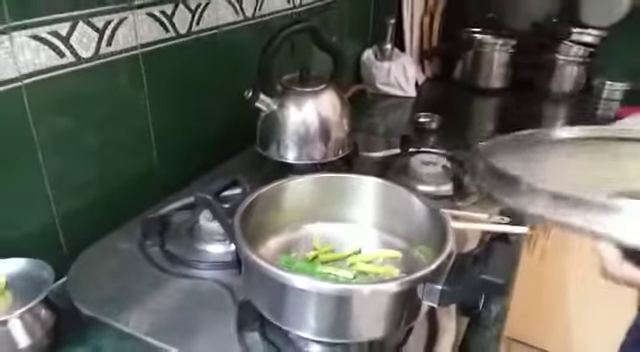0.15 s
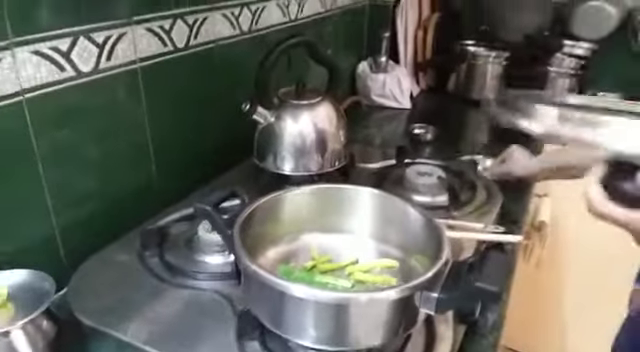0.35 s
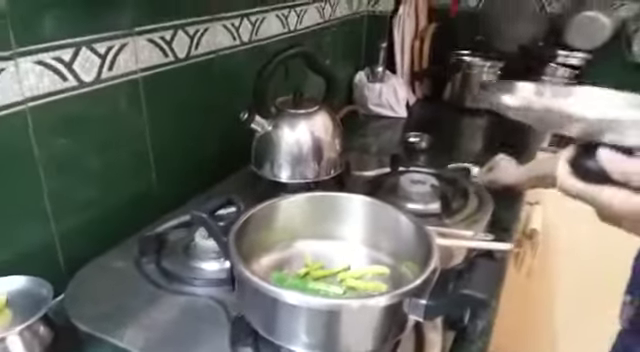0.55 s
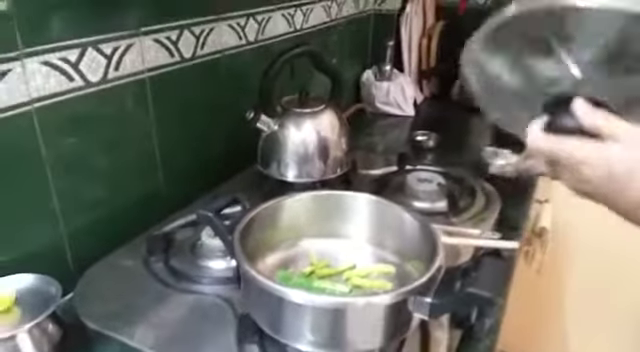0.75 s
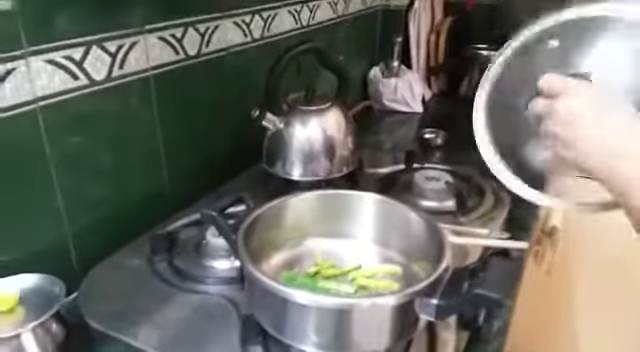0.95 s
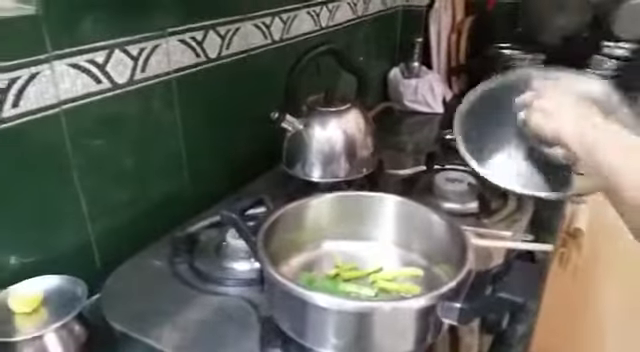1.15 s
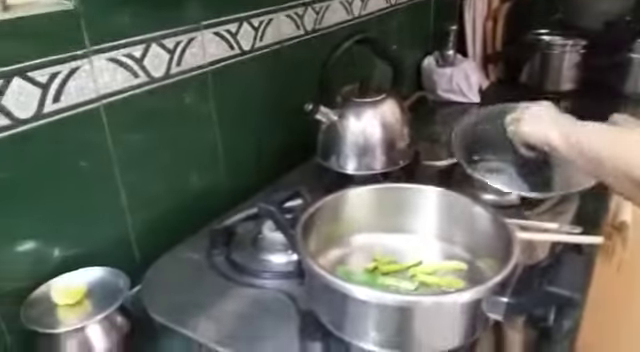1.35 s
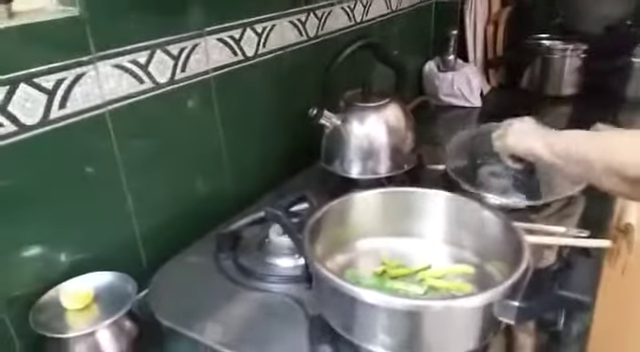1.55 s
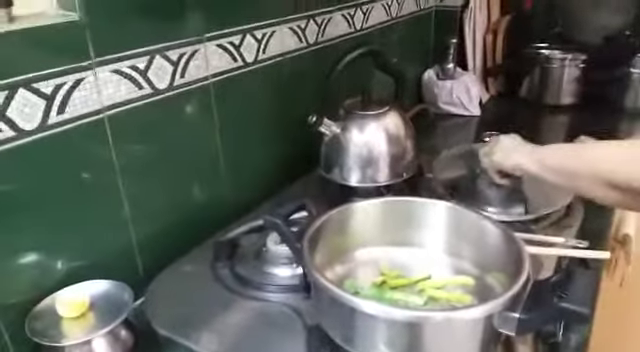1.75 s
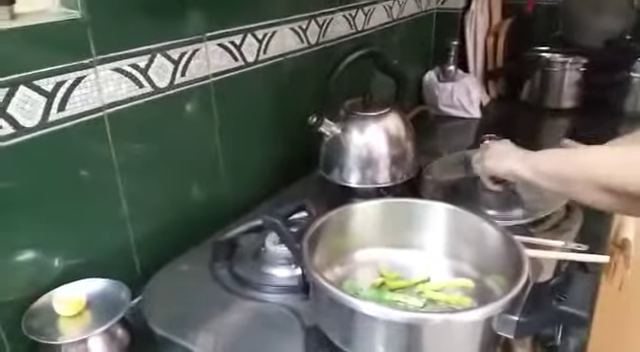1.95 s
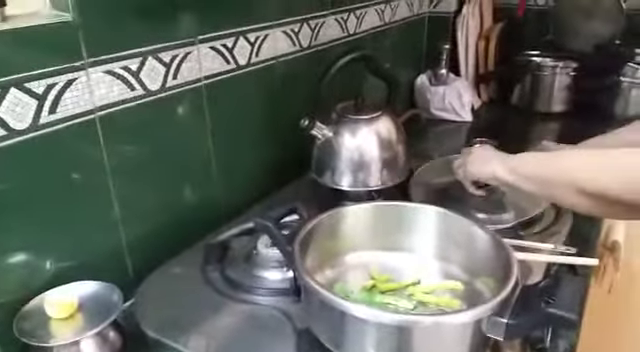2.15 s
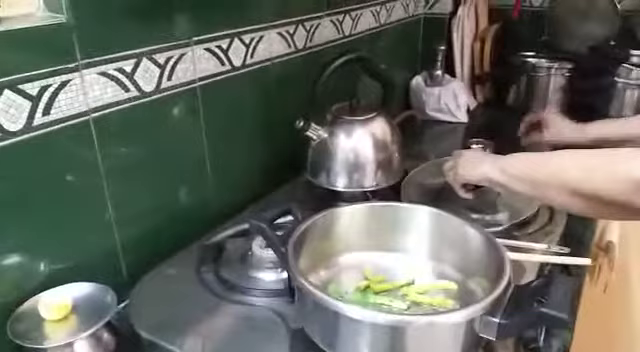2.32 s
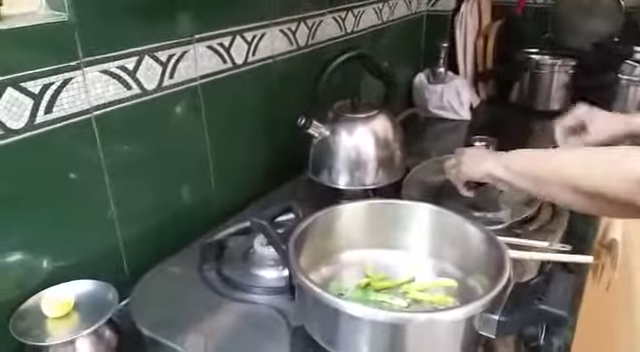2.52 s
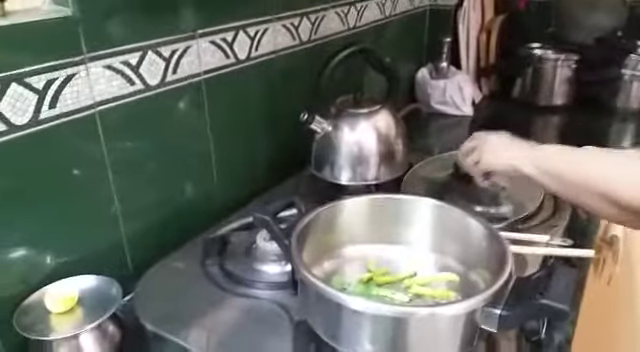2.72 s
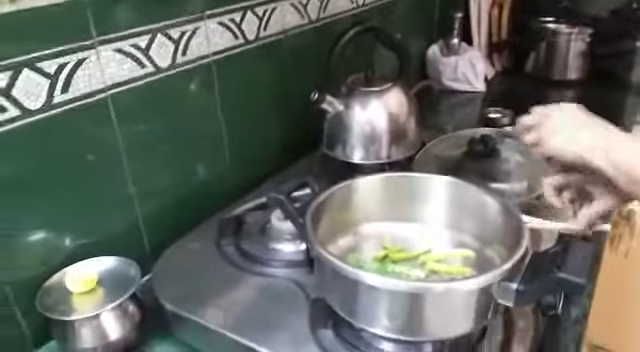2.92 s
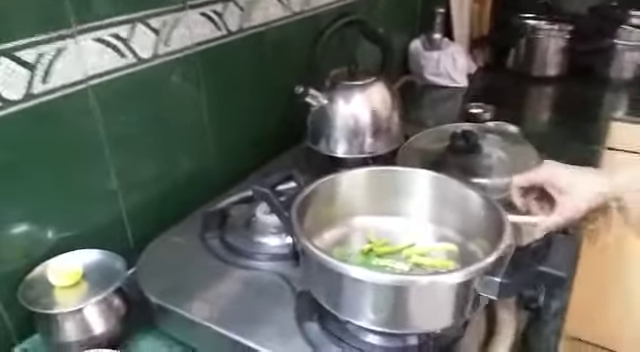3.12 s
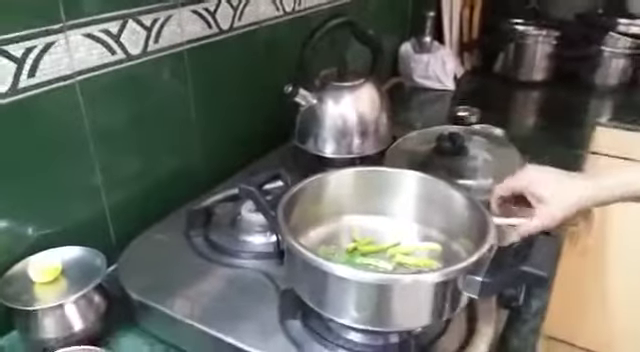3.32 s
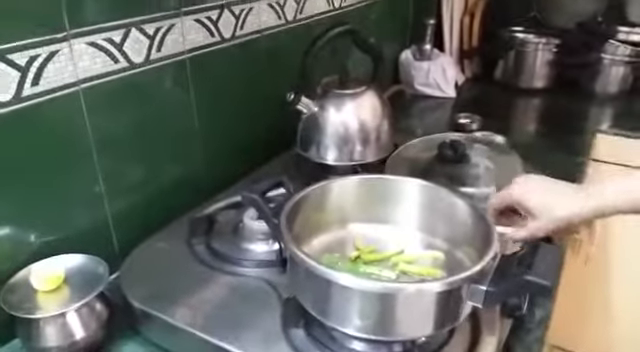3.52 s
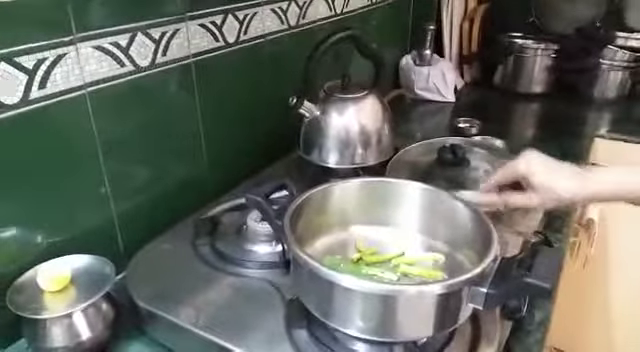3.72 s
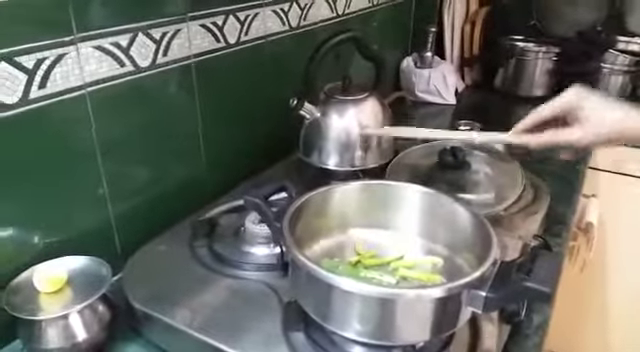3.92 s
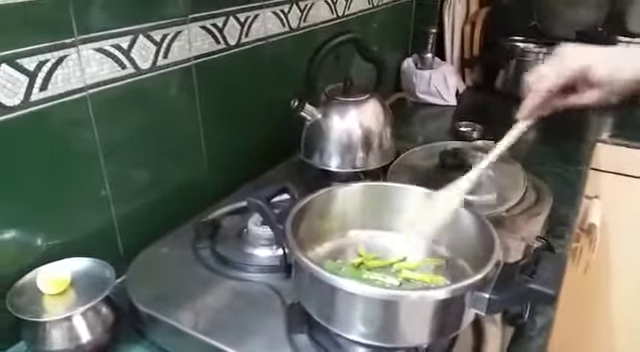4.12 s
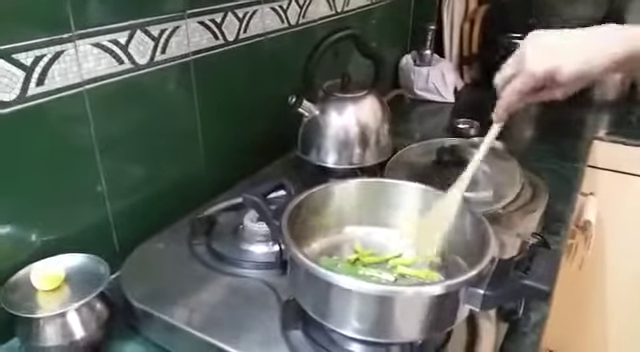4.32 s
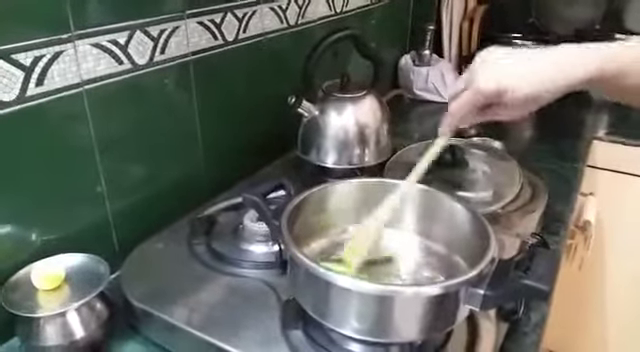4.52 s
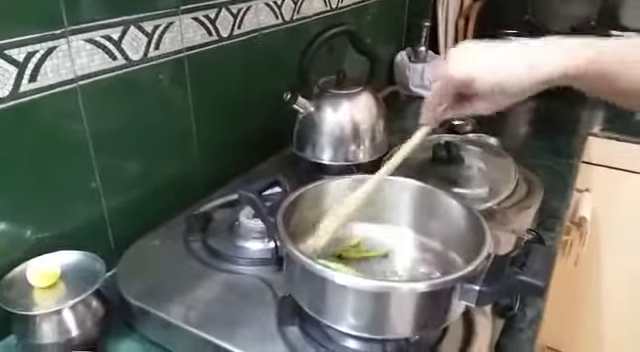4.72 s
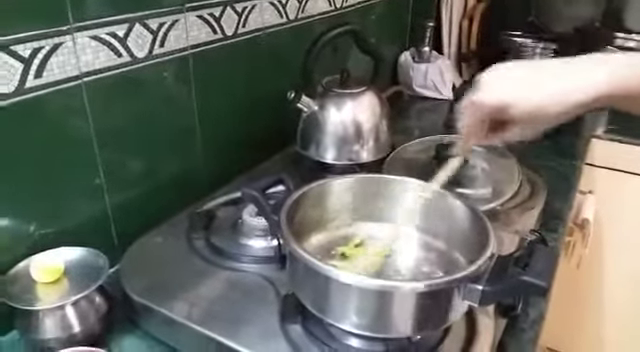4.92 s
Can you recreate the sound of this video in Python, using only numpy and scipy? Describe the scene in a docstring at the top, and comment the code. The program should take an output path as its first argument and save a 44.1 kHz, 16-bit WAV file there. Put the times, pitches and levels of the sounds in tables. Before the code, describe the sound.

Chilies and leaves sizzle finely in hot oil as a lid knocks, clangs loudly onto steel ware, then a wooden spatula stirs up coarse crackling.

```python
"""A fine sizzle and a soft gas flame come first: green chilies and curry leaves fry in a steel pan.
Shaped clicks and noise make the sizzle; drops snap and steam bubbles ring briefly as they burst.
In the tiled kitchen a steel-rimmed glass lid is put down, shifted, and drops with a clang onto steel ware.
Then a wooden spatula knocks and stirs, and the frying swells into a coarser crackle.
Each blow is a burst of noise shaped by the object's body, plus its own dying tones."""
import sys
import numpy as np
from scipy import signal
from scipy.fft import rfft, irfft
from scipy.io import wavfile
from scipy.ndimage import uniform_filter1d, minimum_filter1d

SR = 44100
rng = np.random.default_rng(int(sys.argv[2]) if len(sys.argv) > 2 else 0)


def store_wav(level_fs):
    """Save 16-bit WAV to argv[1]."""
    pcm = np.round(np.clip(np.atleast_2d(level_fs), -1, 1) * 32767)
    wavfile.write(sys.argv[1], SR, pcm.T.astype(np.int16))


N = 223454
TIME = np.arange(N) / SR

# Spectra, giving only the balance between pitches: (f/Hz, level/dB per Hz)
# food lying still, and food pushed over hot steel
RESTING_SPECTRUM = [(1470, -42), (2500, -31), (3080, 1), (3440, -4), (4440, 7.5), (5780, -2), (6350, 3),
                    (11800, 3), (13700, 0.5), (15200, 1.5), (16000, -3.5)]
STIRRED_SPECTRUM = [(900, -26), (1500, -29), (1850, -15), (2200, 1.5), (2700, -14), (3100, -1), (4000, -2),
                    (5600, 2), (6700, 2), (9000, 0), (11700, 8), (15900, -8)]
# the burner's rush, and the snap of a spitting drop
FLAME_SPECTRUM = [(25, -9), (50, -24), (75, -21), (115, -3), (190, -6), (260, -8.5), (310, -2), (410, -0.5),
                  (520, -2), (680, -7.5), (1000, -5.5), (1850, -7.5), (2800, -17.5), (3700, -20.5)]
SNAP_SPECTRUM = [(60, -6), (300, -13.5), (1200, -5.5), (2700, -13), (4200, -6), (9000, -7), (16000, -1.5)]
# dense resonances of the lid, the steel ware and the loaded pan
LID_BODY = [(35, -86), (80, -29), (140, -7.5), (300, -4.5), (560, -7), (780, -4), (980, -9), (1400, -4.5),
            (1900, -1.5), (2400, -10), (3100, -15.5), (4800, -10), (7000, -17), (15500, -18)]
STEEL_BODY = [(40, -54.5), (100, -35), (230, -9.5), (340, -4), (560, -12), (750, -11), (1070, -9.5),
              (1450, -5.5), (2400, -10.5), (4000, -6), (5000, -4.5), (8500, -6), (11600, -2), (16000, -5.5)]
PAN_BODY = [(40, -88), (120, -18), (330, -2), (550, -6), (800, -5), (1100, -6), (1500, -4.5), (2500, -8),
            (3700, -2), (6000, -8), (15500, -3)]

# Clear tones of each object, with the time to fall by 60 dB: (f/Hz, level/dB, t60/s)
LID_MODES = [(620, -14, .4), (1497, 0, .5), (1577, -4, .42), (1830, -1, .35), (2446, -10, .7),
             (2912, -9, .56), (3176, -14, .4), (4016, -15, .5), (4732, -11, .5), (6654, -19, .6),
             (6982, -14, .3), (8619, -19, .32), (13900, -18, .25), (14690, -18, .3)]
STEEL_MODES = [(743, -8, .45), (1460, -2, .4), (1990, -9, .6), (2896, -6, .4), (3440, -7, .45),
               (3565, -8, .5), (4019, 1, .5), (4077, -5, .45), (4325, -1.5, .52), (5152, -8, .35),
               (5779, -4, .4), (5879, -3, .4), (6757, -7, .4), (7473, -4, .6), (7910, -10, .4),
               (8721, -9, .3), (9176, -10, .4), (9494, -10, .35), (9945, -9, .44), (10481, -10, .35),
               (11057, -7, .33), (11239, 0, .33), (11281, -5, .3), (11607, 3, .3), (12016, -10, .4),
               (12495, -8, .33), (12936, -9, .3), (14470, -6, .3)]
PAN_MODES = [(1470, -33, 0.23), (1875, 2.5, 0.065), (2350, -10, 0.23), (3727, 6, 0.074)]
# how long the room's echoes last at each pitch: (f/Hz, t60/s)
KITCHEN_T60 = [(150, 0.63), (500, 0.47), (1500, 0.52), (4000, 0.41), (8000, 0.33), (15000, 0.38)]

# vigour of the resting sizzle, before its trim: (t/s, level/dB)
SIMMER_LEVELS = [(0.0, -47), (0.51, -41.5), (1.01, -46), (1.29, -46.5), (1.67, -41), (1.87, -47.5),
                 (2.61, -49.5), (2.98, -47.5), (3.6, -42.5), (4.3, -45.5)]
# the spatula pushes food over hot steel: (t/s, length/s, level/dB)
STROKES = [(4.211, 0.35, -37), (4.717, 0.28, -32)]
# large steam bubbles that ring as they burst: (t/s, level/dB, f/Hz)
BUBBLES = [(0.057, -6.5, 4560), (.088, -11, 6700), (0.0924, -10.5, 9200), (.1424, -9, 9780),
           (0.2042, -12.5, 8800), (.386, -5.5, 10100), (0.504, -11.5, 9850), (0.5696, -9, 4160),
           (0.844, -10, 10500), (1.2952, -12, 7700), (2.133, -3.5, 4870), (2.231, -4, 7140),
           (2.4347, -11.5, 7000), (3.9046, -7.5, 3240), (4.1085, -10, 5440), (4.2274, -8, 8000),
           (4.4535, -14, 12100)]
# pitch range of the small bubbles: lowest f/Hz, highest f/Hz
SMALL_BUBBLE_RANGE = (3980, 13300)
# water drops that spit with a sharp snap: (t/s, level/dB)
SPITS = [(0.658, -11), (1.1722, -11.5), (1.4651, -6.5), (1.6757, -4.5), (1.902, -0.5), (1.9177, -1),
         (2.096, 10.5), (2.345, -3.5), (2.381, -6.5), (2.6666, -11), (3.4722, 1.5), (4.345, 1),
         (4.5433, -0.5), (4.5522, 1), (4.596, 0.5), (4.7493, 1.5), (4.9308, -5)]
# the lid's rim knocks: (t/s, level/dB, chatter/s, thud f/Hz, bright/dB, ring/dB, favoured f/Hz)
LID_KNOCKS = [(.275, -24.5, 0.0037, 1820, -9, 1.5, 4920), (0.297, -32, 0.0089, 1450, 5, -4, 2910),
              (1.482, -23, 0.0069, 1380, -1.5, -3, 2450), (1.509, -22.5, 0.017, 760, 3, -21, 2450),
              (1.527, -24.5, 0.0054, 301, 4.5, -9, 2450), (1.724, -26, 0.019, 3570, -12, -16, 2450),
              (1.768, -22, 0.03, 4060, -16, -14, 1830)]
# the lid is shifted where it lies: (t/s, level/dB, chatter/s)
LID_SHIFTS = [(2.162, -34.5, .021), (2.181, -31.5, 0.021), (2.68, -33.5, 0.035), (2.712, -34.5, 0.021)]
# the lid falls onto steel ware and bounces: (t/s, level/dB, chatter/s, thud f/Hz)
CLANGS = [(3.000, -21, 0.053, 245), (3.046, -13, 0.013, 5900), (3.064, -13.5, 0.015, 1400),
          (3.091, -11.5, 0.0036, 3100), (3.104, -15, 0.0029, 4000)]
# the spatula meets the pan: (t/s, level/dB, chatter/s, thud f/Hz, bright/dB)
SPATULA_KNOCKS = [(4.150, -20.5, 0.017, 350, -19), (4.375, -34, 0.0025, 3430, 3),
                  (4.629, -38.5, 0.0083, 3400, 3.5), (4.714, -31.5, 0.0038, 3180, 4),
                  (4.87, -47, 0.015, 4880, 14.5), (4.935, -32.5, 0.0046, 5640, 5.5)]

SIMMER_TRIM_DB, FLAME_DB = 0.5, -44.5
STROKE_ATTACK_S, STROKE_RELEASE_S = 0.078, 0.13
POP_ECHO_S, POP_ECHO_DB, POP_SPRAY_DB = 0.0023, -12, -10
SPIT_LOW_HZ, SPIT_DB_PER_OCTAVE = 2660, 7   # low edge of a 0 dB spit; bigger ones reach lower
SMALL_BUBBLES_PER_S, SMALL_BUBBLE_DB, SMALL_BUBBLE_SPREAD_DB = 20, -20.5, 2.5
LID_THUD_DB, LID_NEAREST_DB = 13.5, 10
SHIFT_THUD_HZ, SHIFT_THUD_DB, SHIFT_BRIGHT_DB, SHIFT_RING_DB = 298.6, 14, 7, -16
CLANG_THUD_DB, CLANG_RING_DB = 4.5, 0
SPATULA_THUD_DB, SPATULA_RING_DB = 7, -1.5
RING_WAVER_DB = 2.5
CUTOFF_HZ = 15900


def from_db(db):
    """Turn a level in dB into a gain."""
    return 10 ** (np.asarray(db) / 20)


def rms_one(x):
    """Scale a signal to rms 1."""
    return x / np.sqrt(np.mean(x ** 2) + 1e-20)


def at_hz(points, hz):
    """Read a (f/Hz, value) table on a log-frequency axis."""
    points = np.array(points)
    return np.interp(np.log(hz + 1), np.log(points[:, 0]), points[:, 1])


def add(track, s, sound):
    """Mix a sound into the track from time s on."""
    start = int(s * SR)
    part = sound[..., :N - start]
    track[..., start:start + part.shape[-1]] += part


def drift(rate):
    """Random wandering: lines between chance values of spread 1, at this many values per second."""
    knots = rng.standard_normal(N // 100)
    return np.interp(TIME * rate, np.arange(len(knots)), knots)


def response(spectrum, bump_hz=500, bump_db=0, high_db=0, bump_octaves=0.39, high_hz=3000, size=2048):
    """Build a filter from a spectrum (energy 1), then add a broad bump and a treble shelf."""
    hz = np.arange(size // 2 + 1) * SR / size
    bump = bump_db * np.exp(-np.square(np.log2((hz + 1) / bump_hz) / bump_octaves))
    shelf = high_db * (1 - 1 / (1 + np.square(hz / high_hz) ** 2))
    gains = rms_one(from_db(at_hz(spectrum, hz))) * from_db(bump + shelf)
    cepstrum = irfft(np.log(gains))
    cepstrum[1:size // 2] *= 2      # folding the cepstrum makes the filter react at once (minimum phase)
    cepstrum[size // 2 + 1:] = 0
    return irfft(np.exp(rfft(cepstrum)))


def coloured(x, spectrum):
    """Give a signal a spectrum, at rms 1."""
    return rms_one(signal.fftconvolve(x, response(spectrum))[:N])


def resonate(x, hz, width_hz):
    """Pass a signal through one resonance, with gain 1 at its peak."""
    r = np.exp(-np.pi * width_hz / SR)
    feed = np.array([1, 0, -1]) * (1 - r * r) / 2
    feedback = [1, -2 * r * np.cos(2 * np.pi * hz / SR), r * r]
    return signal.lfilter(feed, feedback, x)


def kitchen(build_s=0.00043, count=9):
    """The tiled room's dense echoes: noise in overlapping bands, each dying at its own rate; energy 1."""
    t = TIME[:SR]
    white = rfft(rng.standard_normal(SR))
    hz = np.arange(SR // 2 + 1)
    centres = np.geomspace(80, 16000, count)
    tail = np.zeros(SR)
    for centre, share in zip(centres, np.eye(count)):
        band = irfft(white * np.interp(hz, centres, share), SR)
        tail += band * from_db(-60 * t / at_hz(KITCHEN_T60, centre))
    tail = tail * (1 - np.exp(-t / build_s))
    return tail / np.linalg.norm(tail)


def sizzle():
    """Food lying still sizzles finely; pushed over hot steel it crackles more coarsely."""
    fine = crackle(per_s=1800, size_db=7.0, clump_db=3.5, width_hz=1060,
                   grain_db=-4.0, hiss_db=-2.0, flutter_db=1.5)
    coarse = crackle(per_s=1700, size_db=4.0, clump_db=4.5, width_hz=1450,
                     grain_db=1.0, hiss_db=-1.5, flutter_db=7.5)
    return simmering() * coloured(fine, RESTING_SPECTRUM) + stirring() * coloured(coarse, STIRRED_SPECTRUM)


def crackle(per_s, size_db, clump_db, width_hz, grain_db, hiss_db, flutter_db, count=14):
    """Tiny steam bubbles burst in clumps, dealt among several pitches, over the hiss of finer ones."""
    born = rng.random(N) < per_s * from_db(clump_db * drift(25)) / SR
    sizes = from_db(size_db * np.minimum(rng.exponential(1, N), 4.5))
    clicks = born * sizes * rng.choice([-1, 1], N)
    dealt = rng.integers(0, count, N)
    grains = np.zeros(N)
    for k, hz in enumerate(np.linspace(2500, 15500, count)):
        own_clicks = clicks * (dealt == k) + 1e-18
        grains += resonate(resonate(own_clicks, hz, width_hz), hz, 2 * width_hz)
    hiss = from_db(hiss_db + flutter_db * drift(40)) * rng.standard_normal(N)
    return from_db(grain_db) * rms_one(grains) + hiss


def simmering():
    """Strength of the resting sizzle, which wanders slowly."""
    return from_db(SIMMER_TRIM_DB + np.interp(TIME, *np.transpose(SIMMER_LEVELS)))


def stirring():
    """Strength of the stirred sizzle: each stroke swells, holds and dies away."""
    strength = np.zeros(N)
    for s, length_s, db in STROKES:
        swell = np.clip((TIME - s) / STROKE_ATTACK_S, 0, 1)
        fade = np.exp(-np.maximum(TIME - s - length_s, 0) / STROKE_RELEASE_S)
        strength += from_db(db) * swell * fade
    return strength


def flame(flicker_db=-0.05):
    """The gas ring rushes softly: coloured noise whose level flickers very slightly."""
    return from_db(FLAME_DB + flicker_db * drift(36)) * coloured(rng.standard_normal(N), FLAME_SPECTRUM)


def pops(delay_s=0.0011, spray_s=0.0092, width_share=0.12, lowest_hz=3200):
    """Drops snap and bubble cavities ring a few cycles; each has a pan-wall echo and a fading spray."""
    out, t = np.zeros(N), TIME[:SR // 25]
    burst = signal.unit_impulse(len(t))
    add(burst, POP_ECHO_S, from_db([POP_ECHO_DB]))
    sprays = np.exp(-t / spray_s) * rng.standard_normal((400, len(t)))
    sprays /= np.linalg.norm(sprays, axis=1, keepdims=True)
    pushes = iter(burst + from_db(POP_SPRAY_DB) * sprays)   # one for each pop

    snap_colour = response(SNAP_SPECTRUM)
    for (s, db), push in zip(SPITS, pushes):
        low_edge_hz = SPIT_LOW_HZ / 2 ** (max(db, 0) / SPIT_DB_PER_OCTAVE)
        thin = signal.butter(2, low_edge_hz, "high", fs=SR, output="sos")
        snap = signal.fftconvolve(push, snap_colour)[:len(t)]
        add(out, s + delay_s, from_db(db) * signal.sosfilt(thin, snap))

    no_bass = signal.butter(3, lowest_hz, "high", fs=SR, output="sos")
    for (s, db, hz), push in zip(BUBBLES + small_bubbles(), pushes):
        tone = signal.sosfilt(no_bass, resonate(push, hz, width_share * hz))
        add(out, min(s + delay_s, TIME[-1]), from_db(db) * tone / np.linalg.norm(tone))
    return out


def small_bubbles():
    """Lesser bubbles burst at random: rows (t/s, level/dB, f/Hz)."""
    draws = rng.random((300, 3))
    times = np.cumsum(-np.log(1 - draws[:, 0])) / SMALL_BUBBLES_PER_S
    levels = SMALL_BUBBLE_DB + SMALL_BUBBLE_SPREAD_DB * (2 * draws[:, 1] - 1)
    low, high = SMALL_BUBBLE_RANGE
    pitches = low * (high / low) ** draws[:, 2]
    return [row for row in zip(times, levels, pitches) if row[0] < TIME[-1]]


def blows(rows, body, modes, room, room_db, modes_db, crack_db, cluster_db, nearest_db,
          ring_pan_db=0, cluster_hz=80, crack_s=0.0073, uneven_db=4.0):
    """A crack and an uneven, dying chatter shake the body's dense resonances and feed its clear modes."""
    knocks, feeds, t = np.zeros(N), [], TIME[:SR // 4]
    for s, level_db, chatter_s, thud_hz, thud_db, bright_db, ring_db, spot_hz in rows:
        unevenness = rms_one(from_db(uneven_db * drift(700)))[:len(t)]
        chatter = np.exp(-t / chatter_s) * unevenness
        force = chatter + from_db(crack_db) * np.exp(-t / crack_s)
        # the spot that is struck stresses one region of the spectrum
        colour = response(body, thud_hz, thud_db, bright_db)
        knock = signal.fftconvolve(force * rng.standard_normal(len(t)), colour)
        add(knocks, s, from_db(level_db) * knock)
        feed = (from_db(level_db + ring_db) * force) ** 2 / np.sum(force ** 2)
        feeds.append((s, feed, spot_hz))
    # while the contact damps them, the modes are broad and gather the chatter's energy around their pitches
    clusters = sum(resonate(knocks + 1e-18, hz, cluster_hz) for hz, db, t60 in modes)
    gathered = knocks + from_db(cluster_db) * clusters
    knocks = rms_one(gathered) * np.std(knocks)
    pan = from_db([[ring_pan_db / 2], [-ring_pan_db / 2]])   # left, right
    ring = from_db(modes_db) * ringing(feeds, modes, nearest_db) * pan
    return knocks + from_db(room_db) * signal.fftconvolve(knocks, room)[:N] + ring


def ringing(feeds, modes, nearest_db):
    """Blows feed wavering, dying modes; the one nearest the struck spot's pitch is raised or lowered."""
    out, pitches = np.zeros(N), np.array(modes)[:, 0]
    for k, (hz, db, t60) in enumerate(modes):
        power = np.full(N, 1e-18)
        for s, feed, spot_hz in feeds:
            nearest = k == np.argmin(np.abs(pitches - spot_hz))
            add(power, s, feed * from_db(nearest_db * nearest) ** 2)
        # energy gains are squared, so -120 here makes the sound fall by 60 dB in t60
        energy = signal.lfilter([1], [1, -from_db(-120 / (t60 * SR))], power)
        level = np.sqrt(energy) * from_db(db + RING_WAVER_DB * drift(50))
        out += level * np.sin(2 * np.pi * hz * TIME + drift(26.32) / 2)
    return out


def lid(room):
    """The lid rings when its rim is knocked; when shifted it mostly rumbles and scrapes."""
    knocks = [(s, db, chatter_s, hz, LID_THUD_DB, bright_db, ring_db, favoured_hz)
              for s, db, chatter_s, hz, bright_db, ring_db, favoured_hz in LID_KNOCKS]
    shifts = [(s, db, chatter_s, SHIFT_THUD_HZ, SHIFT_THUD_DB, SHIFT_BRIGHT_DB, SHIFT_RING_DB, SHIFT_THUD_HZ)
              for s, db, chatter_s in LID_SHIFTS]
    return blows(knocks + shifts, LID_BODY, LID_MODES, room, room_db=1.5, modes_db=-4.5, crack_db=-6.5,
                 cluster_db=-44.0, nearest_db=LID_NEAREST_DB, ring_pan_db=2)


def steel_ware(room):
    """Steel ware clangs under the bouncing lid, its many modes fed in step with each blow's level."""
    rows = [(s, db, chatter_s, hz, CLANG_THUD_DB, 0, CLANG_RING_DB, hz) for s, db, chatter_s, hz in CLANGS]
    return blows(rows, STEEL_BODY, STEEL_MODES, room, room_db=3.0, modes_db=-16.0, crack_db=-3.5,
                 cluster_db=3.5, nearest_db=-2.0)


def spatula(room):
    """Wood knocks on the loaded pan, which rings only briefly, and the less the softer the contact."""
    rows = [(s, db, chatter_s, hz, SPATULA_THUD_DB, bright_db, SPATULA_RING_DB + bright_db, hz)
            for s, db, chatter_s, hz, bright_db in SPATULA_KNOCKS]   # a softer contact is less bright
    return blows(rows, PAN_BODY, PAN_MODES, room, room_db=-1.5, modes_db=-8.5, crack_db=1.5,
                 cluster_db=-15.0, nearest_db=-3)


def scene(oil_room_db=-4.5):
    """The frying is close; the knocks of the lid, further back, get more of the room's echoes."""
    room = kitchen()
    spits = pops()
    frying = sizzle() + spits + from_db(oil_room_db) * signal.fftconvolve(spits, room)[:N]
    return frying + flame() + lid(room) + steel_ware(room) + spatula(room)


def gain_control(x, threshold_db=-18.0, sense_s=0.035, attack_s=0.3, hold_s=0.79, release_db_per_s=19):
    """Loud sound turns the gain down; it is held there, then creeps back."""
    power = uniform_filter1d(np.mean(x ** 2, axis=0), int(sense_s * SR))
    over_db = np.maximum(10 * np.log10(np.abs(power) + 1e-12) - threshold_db, 0)
    half = int(hold_s * SR / 2)
    # the largest excess within the past hold time
    held_db = -minimum_filter1d(-over_db, 2 * half + 1, origin=half, mode="constant")
    release_db = release_db_per_s * TIME
    cut_db = np.maximum.accumulate(held_db + release_db) - release_db
    r = np.exp(-1 / (attack_s * SR))
    return x * from_db(-signal.lfilter([1 - r], [1, -r], cut_db))


def record(dry, ceiling=2.9, lowest_hz=45):
    """The microphone drops deep bass, gain ducks after loud sound, peaks are rounded, the top is cut."""
    thin = signal.sosfilt(signal.butter(2, lowest_hz, "high", fs=SR, output="sos"), dry)
    rounded = ceiling * np.tanh(gain_control(thin) / ceiling)
    top_cut = signal.ellip(12, 0.1, 80, CUTOFF_HZ, fs=SR, output="sos")
    return signal.sosfilt(top_cut, rounded)


dry = scene()
out = record(dry)
store_wav(out)
```